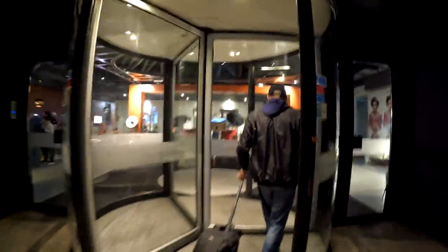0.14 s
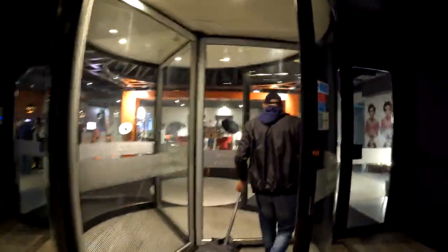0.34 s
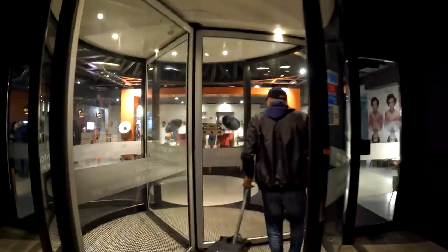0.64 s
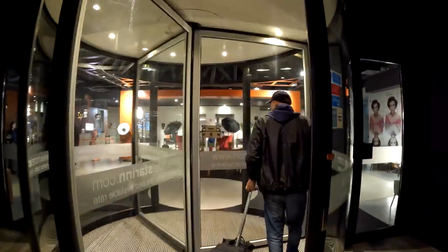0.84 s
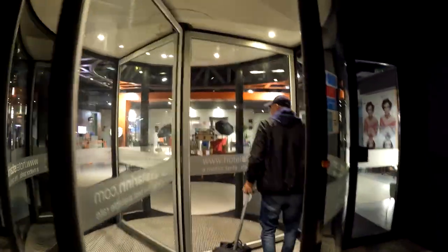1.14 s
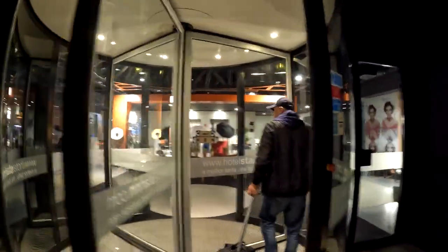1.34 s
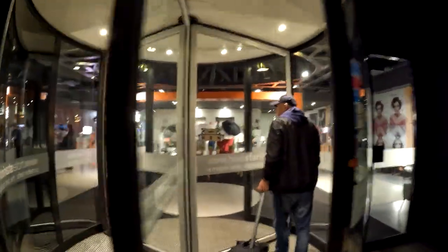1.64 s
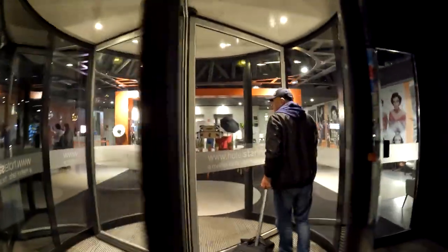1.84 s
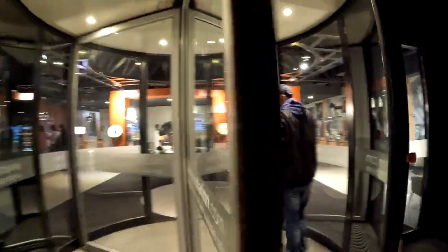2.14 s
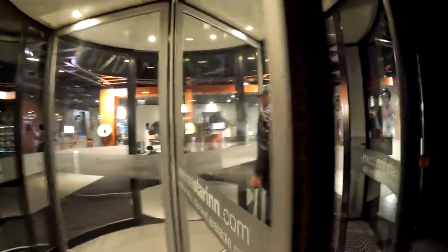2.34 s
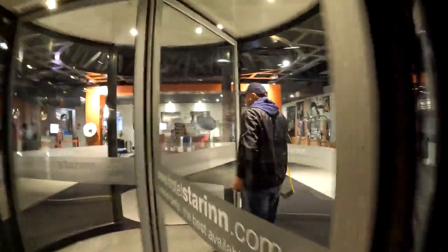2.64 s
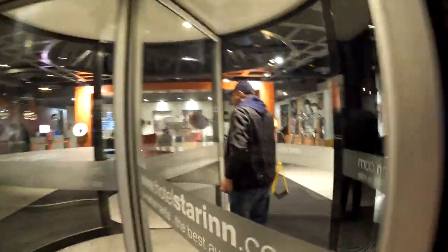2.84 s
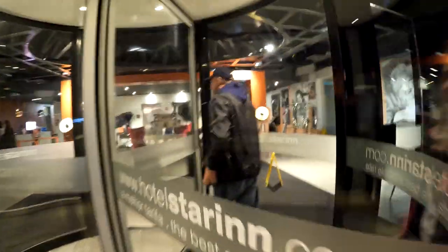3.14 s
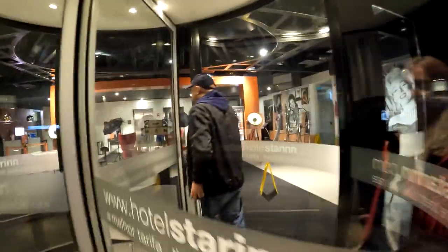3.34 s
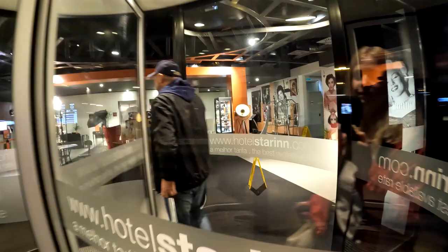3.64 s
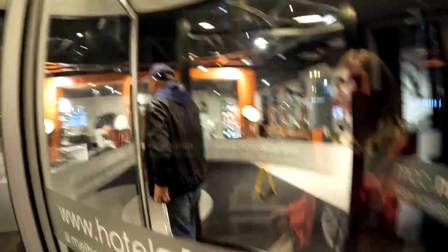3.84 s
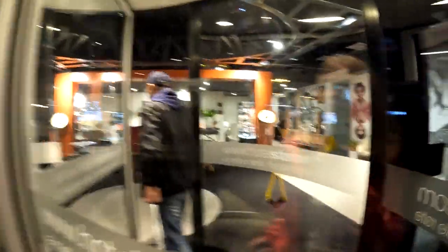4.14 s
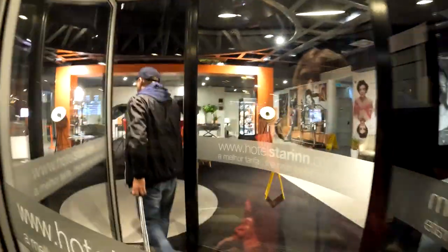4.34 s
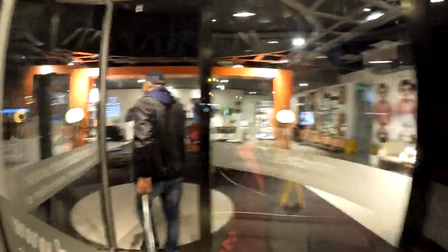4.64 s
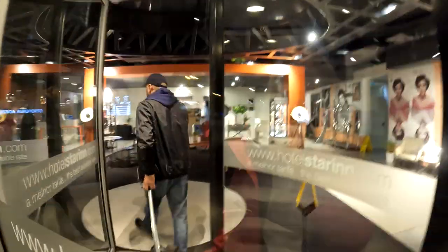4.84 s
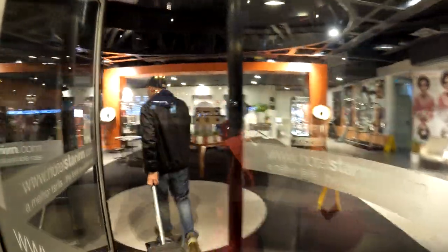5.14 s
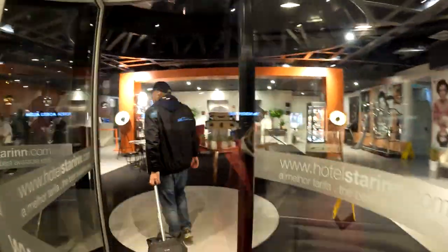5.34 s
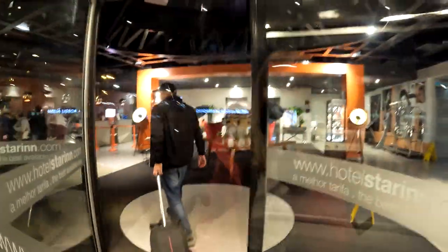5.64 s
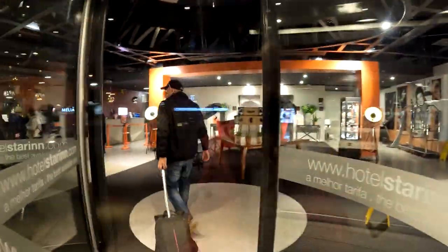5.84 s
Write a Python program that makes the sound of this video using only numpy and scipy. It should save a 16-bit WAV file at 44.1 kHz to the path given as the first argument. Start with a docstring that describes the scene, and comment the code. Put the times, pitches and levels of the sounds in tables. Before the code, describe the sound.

A wheeled suitcase rumbles through a revolving door over a deep droning boom, with cloth rustling and bursts of plastic clicks, knocks and thuds.

```python
"""The air in the drum of a glass revolving door booms at 52 to 62 Hz as a wheeled suitcase is pulled through.
Rough-floor noise drives the wheels' rumble and the hollow resonances of the case; smooth pulses make low thuds.
Cloth hisses by grainy friction; scuffs, scrapes and plastic snaps are brief noise bursts and short rings.
The handle rattles in its modes, zip pulls sing as thin tones, and the panes reverberate the contacts.
Banded noise makes the surrounding street and ventilation wash."""
import sys
import numpy as np
from scipy import signal
from scipy.io import wavfile

SR = 44100
rng = np.random.default_rng(int(sys.argv[2]) if len(sys.argv) > 2 else 0)


def nominal_scale(level):
    """Amplitude ratio for a level in decibels (scalar or array-like)."""
    x = np.asarray(level, float) / 20
    return 10 ** x


def generate_wav(signal):
    """Clip the signal to [-1, 1] and save it as 16-bit WAV at the path in sys.argv[1]."""
    frames = np.transpose(np.atleast_2d(signal))
    scaled = np.clip(frames, -1, 1) * 32767
    pcm = np.round(scaled).astype(np.int16)
    wavfile.write(sys.argv[1], SR, pcm)


N = 264159

# drum boom and rolling: time_s, boom_hz, boom_db, deep_rumble_db, wheel_rumble_db
ROLLING_COURSE = [(0.0, 58.4, -19, -43, -26), (0.23, 60.4, -26, -21, -29), (0.8, 61.7, -25, -29, -31.5),
                  (.96, 60.74, -32, -32, -29.5), (1.25, 60.65, -21.5, -38, -28),
                  (1.85, 59.6, -29, -30, -29), (2.15, 58.37, -32, -31, -30.5), (2.32, 61.66, -28, -25, -29),
                  (2.64, 53.45, -30.5, -26, -31.5), (2.95, 52.85, -27, -24.5, -31.5),
                  (3.08, 52.5, -23, -14.5, -27.5), (3.2, 52.4, -25, -25.5, -29),
                  (3.37, 52.13, -26, -19.5, -29.5), (3.49, 61, -24.5, -40, -29),
                  (3.57, 59.95, -19.5, -36, -31.5), (3.85, 61.47, -19.5, -27, -27.5),
                  (4.74, 61.44, -19.5, -27, -30.5), (5.12, 51.8, -20.5, -20.5, -28),
                  (5.36, 60.6, -17.5, -26, -27), (5.64, 61.75, -16.5, -23, -27),
                  (5.76, 55, -20, -15.5, -30), (5.91, 53.7, -24, -24, -23), (5.99, 57.6, -31, -17, -34)]
# hollow resonances of the case: centre_hz, width_hz, usual_level_db
CASE_RESONANCES = [(103.2, 18.3, -43), (141.9, 10.2, -41), (186.5, 19.6, -42), (239, 21, -42),
                   (279, 21, -43), (331, 59, -47.5)]
# for each case resonance in turn, its passing swells: middle_s, rise_db, length_s
CASE_SWELLS = [
    [(.15, 13.5, 0.31), (3.1, 13.5, 0.96), (4.05, 17, 0.91), (4.8, 13, 0.52)],
    [(.3, 7.5, 0.21), (3.45, 1, .4), (4.2, 7.5, 1), (5.2, 14, 0.63)],
    [(.6, 9.5, 0.97), (1.8, 7.5, 0.66), (4.8, 6, 0.32)],
    [(.3, 4, 0.54), (5.7, 2.5, 0.76)],
    [(1.8, 9, 0.54), (2.95, 6.5, 0.55), (5.6, 6.5, 0.93)],
    [(1.8, 1, 0.53), (4.1, 10, .4), (5.7, 5.5, 0.33)],
]
# relative spectrum of the street and ventilation wash: frequency_hz, density_db (per Hz)
WASH_SPECTRUM = [(190, 8), (330, -2), (436, -4), (614, -3.5), (780, -7), (980, -3), (1300, -8.5),
                 (1730, -11.5), (2400, -20), (3270, -25.5), (7110, -37.5), (8300, -54), (12000, -40),
                 (13400, -68.5), (15500, -73)]
# overall course of the wash: time_s, level_db
WASH_COURSE = [(0.0, -34.5), (1.2, -34.5), (2.9, -35), (3.75, -35.5), (4.05, -33.5), (4.35, -37),
               (5.0, -34), (5.99, -35)]
# left-right correlation of the wash: frequency_hz, likeness (0 to 1)
WASH_LIKENESS = [(60, 0.99), (150, 0.83), (360, 0.95), (880, 0.82), (2160, 0.5), (5290, 0.72),
                 (13000, 0.93)]
# left-right balance of the wash: frequency_hz, left_minus_right_db
WASH_LEAN = [(60, 0.0), (110, 0.0), (200, 12), (360, 0), (650, 1.5), (1190, 2), (2160, 1.5), (3930, 0),
             (7140, 1.5), (13000, 5)]
# steady rubbing of cloth and straps, before band weighting: time_s, relative_level_db
RUBBING_COURSE = [(0.0, -59.5), (.7, -61.5), (1.05, -61.5), (1.35, -69), (2.3, -59.5), (3.2, -65),
                  (3.82, -62), (3.85, -48), (3.9, -49), (3.95, -45.5), (4.05, -49), (4.2, -46.5),
                  (4.27, -57.5), (4.6, -61), (5.2, -64.5), (5.99, -59)]
# single swishes of cloth, before band weighting: peak_s, relative_level_db, brightness_db, t60_s
CLOTH_SWISHES = [(0.461, -49.5, -22, 0.19), (.56, -53.5, -22, 0.35), (1.68, -52, -19, 0.043),
                 (2.31, -54, -22, 0.41), (3.312, -47.5, -8, 0.17), (3.61, -54, -16, .5),
                 (3.975, -46, -8, 0.21), (4.1, -41, -12, 0.28), (4.36, -51, -18, 0.35),
                 (4.65, -58, -4, 0.38), (4.83, -52.5, -23, 0.14), (4.93, -56, -5, 0.34),
                 (5.07, -46.5, -13, 0.18), (5.2, -65.5, 3, 0.35), (5.4, -54, -22, 0.21),
                 (5.5, -53, -26, 0.29), (5.58, -53, -24, 0.22), (5.689, -66, -15, 0.24),
                 (5.76, -53, -22, 0.31), (5.889, -54, -11, 0.13)]
# damped rings of hard plastic; those starting together make one snap: start_s, level_db, pitch_hz, t60_s
PLASTIC_SNAPS = [(.0508, -37, 1500, 0.01), (.896, -38, 3660, .02), (3.2772, -37, 7400, .007),
                 (3.2775, -40, 11500, .008), (3.282, -36, 3000, .008), (3.3013, -20.5, 2820, 0.0075),
                 (3.301, -27, 1350, 0.011), (3.3018, -33, 10300, .004), (3.3012, -31, 5700, .004),
                 (3.3018, -29, 11800, .003), (3.314, -42, 7600, .008), (4.1115, -21, 10000, 0.0033),
                 (4.1115, -24, 12300, .003), (4.1106, -26, 7000, .006), (4.1245, -38, 8500, .008),
                 (4.126, -32, 11000, .003), (4.1686, -20, 1030, 0.0097), (4.171, -18, 2327, 0.0033),
                 (4.2035, -27.5, 3020, 0.009), (4.2093, -29, 2620, .01), (5.6928, -35, 3400, 0.007),
                 (5.694, -28, 1500, .01), (5.699, -24, 1920, .008), (5.7508, -35, 7500, .006),
                 (5.7508, -38, 11530, .004), (5.7605, -18, 1570, 0.006), (5.7613, -30, 3280, 0.0068),
                 (5.765, -21.5, 2030, 0.0094), (5.764, -33, 4700, .006), (5.7715, -33, 3200, .008),
                 (5.829, -18, 1510, 0.013), (5.832, -21, 2250, 0.0065), (5.8352, -19.5, 1970, 0.0064),
                 (5.8344, -19.5, 2800, .005), (5.836, -27, 3700, .005), (5.977, -28, 1810, .012)]
# scuffs and clicks of the case: start_s, knock_db, middle_db, sparkle_db
CASE_SCUFFS = [(0.453, -49, -55, -62), (0.533, -49, -50, -55), (.7244, -52, -53, -68),
               (0.868, -52, -60, -69), (0.896, -59, -50, -67), (0.9575, -51, -59, -62),
               (0.9696, -48, -50, -65), (0.995, -49, -48, -63), (1.0644, -55, -56, -56),
               (1.11, -43, -66, -70), (1.177, -51, -52, -66), (1.669, -55, -58, -50.5),
               (2.3007, -49, -52, -64), (2.479, -52, -46, -66), (2.7491, -55, -49, -60),
               (3.2773, -50, -46, -49), (3.297, -52, -52, -55), (3.3126, -47, -53, -56),
               (3.405, -54, -50, -64), (3.6075, -47, -47, -64), (3.8427, -53, -44, -58),
               (3.854, -51, -46, -64), (3.8707, -47, -39, -57), (3.9254, -42, -54, -60),
               (3.9423, -37.5, -50, -53), (3.973, -44, -38, -51), (4.006, -52, -39.5, -58),
               (4.041, -39, -46, -55), (4.091, -54, -40, -52), (4.109, -53, -50, -43),
               (4.124, -48, -44, -44), (4.172, -42.5, -50, -59), (4.1999, -42, -45, -56),
               (4.345, -46, -50, -60), (4.362, -48, -44, -56), (4.642, -51, -43, -50),
               (4.8921, -59, -51, -70), (4.915, -45.5, -53, -69), (5.0546, -47, -52, -60),
               (5.192, -54, -44, -66), (5.3082, -60, -50, -55), (5.3903, -45, -46.5, -63),
               (5.5038, -58, -51, -63), (5.565, -41.5, -58, -62), (5.692, -39, -52, -63),
               (5.758, -39, -44, -60), (5.8286, -52, -44, -62), (5.861, -52, -44, -63),
               (5.9146, -46, -47, -74), (5.971, -41, -46, -64)]
# scrapes of the shell against the door: start_s, length_s, level_db, centre_hz
SHELL_SCRAPES = [(0.457, 0.031, -53, 4400), (3.84, 0.016, -38, 2000), (3.842, 0.015, -39, 880),
                 (3.84, 0.011, -40, 3000), (3.986, 0.012, -36, 630), (3.915, 0.023, -43, 2500),
                 (3.917, 0.037, -44, 1300), (3.959, 0.0094, -39, 3700), (3.968, .012, -51, 6500),
                 (4.077, 0.012, -45, 4800), (4.093, 0.0075, -41, 4480), (4.103, .008, -45, 5500),
                 (4.119, 0.023, -37.5, 1130), (4.192, 0.026, -50, 1090)]
# zip pulls touching: start_s, level_db, pitch_hz, length_s
ZIP_TOUCHES = [(0.478, -51, 4000, 0.027), (0.495, -61, 6900, 0.026), (0.5, -66, 12300, 0.03),
               (0.724, -53, 4060, 0.057), (0.998, -47, 4060, 0.045), (3.898, -48, 6880, 0.014),
               (3.985, -50, 11200, .015), (4.017, -49, 11250, .011), (4.03, -52, 11250, .009),
               (4.039, -48, 11250, 0.011), (4.014, -41, 6800, 0.013), (5.214, -48.5, 7026, 0.023),
               (5.305, -61, 12000, 0.04), (5.863, -50, 9500, 0.01), (5.871, -46, 6840, 0.043)]
# low thuds of the case and wheels, with their rebounds and dying tails, before the shell's ring:
# centre_s, level_db, width_s
THUDS = [(3.108, -16.5, 0.00093), (3.128, -15.5, 0.0011), (3.5976, -4, 0.0017), (3.6124, -8, 0.0019),
         (4.0375, -10, 0.0011), (4.046, -16.5, 0.00084), (4.088, -15, 0.0015), (4.096, -22, 0.0018),
         (4.123, -26, 0.00051), (4.127, -19, 0.00069), (4.131, -30, 0.0004), (4.1382, -16, 0.0008),
         (4.1433, -23, 0.0007), (4.147, -13, 0.0033), (4.155, -19, 0.00084), (4.2, -26, 0.00067),
         (4.775, -19, 0.00091), (5.701, -9, 0.0028)]
# ring of the shell after a thud: centre_hz, width_hz, gain_db
SHELL_RING = [(137, 13, -6), (355, 48, 5.5), (446.9, 62, 7), (600, 57, 18.5)]
# shakes of the telescopic handle in its tube, as drive to its modes: start_s, drive_db
HANDLE_SHAKES = [(3.8579, -25.5), (3.861, -33), (3.868, -37), (3.8705, -34), (3.9101, -43), (3.948, -41),
                 (3.88, -40), (3.888, -42), (3.9, -49), (3.9534, -34), (3.967, -30.5), (3.978, -42),
                 (3.986, -44), (4.0081, -36)]
# modes of the handle: pitch_hz, gain_db, t60_s
HANDLE_MODES = [(2030, -6, 0.018), (2950, -1, 0.027), (3020, 3, 0.024), (3120, -4.5, 0.035),
                (3260, -9, 0.012), (3660, -10, 0.014), (3860, -24, 0.021), (5700, -8, 0.021)]


def rms_one(x):
    """Normalization of a signal to unit root-mean-square value."""
    return x / np.sqrt(np.mean(x ** 2) + 1e-20)


def in_time(rows):
    """Linear interpolation of a table's columns over all samples."""
    time_s, *columns = np.transpose(rows)
    return [np.interp(np.arange(N) / SR, time_s, column) for column in columns]


def at_hz(points, hz):
    """Interpolation of a spectrum on a logarithmic frequency axis."""
    table_hz, values = np.transpose(points)
    return np.interp(np.log(hz), np.log(table_hz + 1), values)


def drift(rate_hz):
    """Slow random fluctuation of unit rms: white noise through two equal low-pass poles at rate_hz."""
    step = 40     # samples between computed points
    r = np.exp(-2 * np.pi * rate_hz * step / SR)
    white = rng.standard_normal(N // step + 2002)
    slow = signal.lfilter([1], [1, -2 * r, r * r], white)[2000:]     # the filter has settled
    return np.interp(np.arange(N) / step, np.arange(len(slow)), rms_one(slow))


def band(x, low_hz, high_hz):
    """Band-pass filtering between two corner frequencies."""
    return signal.sosfilt(signal.butter(2, [low_hz, high_hz], "band", fs=SR, output="sos"), x)


def resonate(x, hz, width_hz):
    """Single damped resonance: a pole pair whose radius sets the bandwidth, with unit gain at the peak."""
    r = np.exp(-np.pi * width_hz / SR)
    zeros = np.array([1, 0, -1]) * (1 - r * r) / 2
    return signal.lfilter(zeros, [1, -2 * r * np.cos(2 * np.pi * hz / SR), r * r], x)


def resonate_twice(x, hz, width_hz):
    """Two equal resonances in cascade, which steepen the skirts."""
    return resonate(resonate(x, hz, width_hz), hz, width_hz)


def ring(clicks, hz, t60_s):
    """Impulse response of a damped mode: a unit click starts a sine of unit initial height."""
    r, w = nominal_scale(-60 / (t60_s * SR)), 2 * np.pi * hz / SR
    return signal.lfilter([0, np.sin(w)], [1, -2 * r * np.cos(w), r * r], clicks + 1e-18)


def boom(hz, level_db, steady, waver_hz, second_hz, second_db):
    """Air mode of the drum, driven steadily and waveringly, mixed with a weaker second mode of fixed pitch."""
    turn = np.exp(2j * np.pi * np.cumsum(hz) / SR)
    drive = steady + drift(waver_hz) + 1j * drift(waver_hz)
    main = rms_one((drive * turn).real)
    second = rms_one(resonate_twice(rng.standard_normal(N), second_hz, 20.0))
    return nominal_scale(level_db) * rms_one(main + nominal_scale(second_db) * second)


def rolling():
    """Roughness excitation: the floor drives wheels and hollow case, nearly alike in both ears."""
    boom_hz, boom_db, deep_db, rumble_db = in_time(ROLLING_COURSE)
    t = np.arange(N) / SR
    # the second mode near 53 Hz beats with the boom while that is near 61 Hz
    out = boom(boom_hz, boom_db, steady=1.31, waver_hz=15.4, second_hz=53.1, second_db=-14.0)

    deep = band(band(rng.standard_normal(N), 10.4, 43.6), 24.6, 53.7)
    out += nominal_scale(deep_db) * rms_one(deep * nominal_scale(1.3 * drift(6.8)))

    rough = rng.standard_normal(N) * nominal_scale(1.0 * drift(17.6))
    rumble = band(band(rough, 54.0, 300), 60.0, 300) + 2.92 * band(rough, 44.3, 141.0)
    out += nominal_scale(rumble_db) * rms_one(rumble)

    for (hz, width_hz, usual_db), swells in zip(CASE_RESONANCES, CASE_SWELLS):
        level_db = usual_db + 2.0 * drift(1.95)
        for middle_s, rise_db, length_s in swells:
            level_db += rise_db * np.exp(-(2 * (t - middle_s) / length_s) ** 2)
        out += nominal_scale(level_db) * rms_one(resonate_twice(rng.standard_normal(N), hz, width_hz))

    # the two ports differ slightly
    unlike = nominal_scale(-45) * rms_one(band(rng.standard_normal(N), 15, 50))
    unlike += nominal_scale(-61) * rms_one(band(rng.standard_normal(N), 60, 180))
    return out + unlike * [[1], [-1]]


def wash(patchy_db):
    """Diffuse noise field: third-octave bands, each with its own level, flicker, correlation and balance."""
    out = 0
    edges_hz = 280 * 2 ** np.arange(0, 6.1, 1 / 3)
    white = rng.standard_normal((2, 2, N))     # neighbouring bands take different noise
    gusts = 0.25 * drift(2.3) + 0.51 * drift(40)     # shared by all bands
    for k, (low_hz, high_hz) in enumerate(zip(edges_hz, edges_hz[1:])):
        mid, side = band(white[k % 2], low_hz, high_hz)
        hz = np.sqrt(low_hz * high_hz)
        alike = np.clip(at_hz(WASH_LIKENESS, hz), 0, 1)
        lean = nominal_scale(at_hz(WASH_LEAN, hz) / 2 * np.array([[1], [-1]]))
        gain = nominal_scale(at_hz(WASH_SPECTRUM, hz) + patchy_db * (gusts + drift(5.9)))
        stereo = np.sqrt(1 + alike) * mid + np.sqrt(1 - alike) * side * [[1], [-1]]
        out = out + gain * lean * stereo
    return nominal_scale(in_time(WASH_COURSE)[0]) * rms_one(out)


def grains(per_s, spread_db, share):
    """Stick-slip friction in stereo: smooth noise with random tiny snaps in it."""
    heights = nominal_scale(spread_db * np.minimum(rng.exponential(1, N), 4))
    tiny_snaps = (rng.random(N) < per_s / SR) * heights * rng.choice([-1, 1], N)
    unlike = 0.7 * rng.standard_normal((2, N))
    return rng.standard_normal(N) + share * rms_one(tiny_snaps) + unlike


def patchy(x, low_hz, high_hz, patchy_db, rate_hz):
    """Independent modulation of four strips, equally wide in logarithmic frequency."""
    edges_hz = np.geomspace(low_hz, high_hz, num=5)
    return sum(band(x, low, high) * nominal_scale(patchy_db * drift(rate_hz)) for low, high in zip(edges_hz, edges_hz[1:]))


def rustle():
    """Friction of cloth: grainy hiss falling towards the treble, with a fluttering top band of its own."""
    t = np.arange(N) / SR
    body_power = nominal_scale(2 * in_time(RUBBING_COURSE)[0])
    bright_power = body_power * nominal_scale(2 * -16)     # brightness of the steady rubbing, dB
    for peak_s, db, bright_db, t60_s in CLOTH_SWISHES:
        rise_db = 10 * (peak_s - t) / 0.022
        fall_db = 60 * (t - peak_s) / t60_s
        swish_power = nominal_scale(2 * (db - np.where(t < peak_s, rise_db, fall_db)))
        body_power = body_power + swish_power     # powers add
        bright_power = bright_power + swish_power * nominal_scale(2 * bright_db)

    rub = grains(650, spread_db=-0.5, share=0.71) * nominal_scale(1.3 * drift(30))
    airy = rub + 1.7 * rng.standard_normal((2, N))     # the top differs more between the ears
    top = patchy(airy * np.sqrt(bright_power), 4750, 13000, patchy_db=3.0, rate_hz=40)
    top = top * nominal_scale(np.array([[6.5], [0.5]]))
    rub = rub * np.sqrt(body_power)
    flickering = patchy(rub, 2100, 7080, patchy_db=5.5, rate_hz=33)
    return 0.56 * flickering + 2.81 * band(rub, 1420, 5180) + top


def snaps():
    """Impulse response of hard plastic: each row is one damped ring; rings starting together make one snap."""
    out = np.zeros(N)
    impulse = np.pad(np.array([.25, .5, .25]), (0, 1997))
    for start_s, db, hz, t60_s in PLASTIC_SNAPS:
        i = round(start_s * SR)
        out[i:i + 2000] += nominal_scale(db) * ring(impulse, hz, t60_s)[:N - i]
    return out


def drum_reverberation(x):
    """Reverberation between the glass panes: convolution with dying noise, another in each ear."""
    t = np.arange(int(.3 * SR)) / SR
    t60_s, delay_s = 0.11, .004
    tail = rng.standard_normal((2, len(t))) * nominal_scale(-60 * t / t60_s) * (t > delay_s)
    tail = signal.lfilter([.5], [1, -.5], tail)     # dulls the treble
    tail = tail / np.sqrt(np.sum(tail ** 2) / 2)
    return signal.fftconvolve(x[None], tail, axes=1)[:, :N]


def scuffs():
    """Contact transients: a sharp tick and a dying burst of grains in knock, middle and sparkle bands."""
    out, t = np.zeros((2, N)), np.arange(int(.15 * SR)) / SR
    edges_hz = ((1250, 4600), (2600, 7050), (7500, 13000))
    burst = grains(2000, spread_db=4.0, share=0.6)
    layers = [rms_one(band(burst, *pair)) for pair in edges_hz]
    layers[0] = rms_one(layers[0] + 0.38 * resonate(layers[0], 1700, 410))     # the shell knocks woodily

    click = signal.unit_impulse(len(t), idx=60)
    ticks = [band(click, *pair) for pair in edges_hz]
    rebound_s = 0.0056     # a knock touches twice
    touch = click + 0.61 * signal.unit_impulse(len(t), idx=60 + round(rebound_s * SR))
    ticks[0] = band(touch, 1600, 2760) + 3.1 * resonate_twice(touch, 1480, 560)

    # faint scuffs at random, 3 per second on average
    starts = np.flatnonzero(rng.random(N // 100) < 3 * 100 / SR) * 100 / SR
    faint = [(start_s, -48, -63, -70) for start_s in starts]

    dying = (1 - np.exp(-t / 0.00023)) * nominal_scale(-60 * t / 0.065)     # t60 is 0.065 s
    for start_s, *levels_db in CASE_SCUFFS + faint:
        i = round(start_s * SR)
        shape = dying[:N - i]
        span = slice(i, i + len(shape))
        for layer, tick, db in zip(layers, ticks, levels_db):
            crack = 3.8 * tick[:N - i] / tick.max()
            out[:, span] += nominal_scale(db) * (shape * layer[:, span] + crack)
    return out * nominal_scale(np.array([[.4], [-.4]]))


def scrapes():
    """Stick-slip of shell on door: uneven grains catch and let go, coloured by one broad resonance."""
    out = np.zeros((2, N))
    grit = grains(900, spread_db=7.0, share=1.3)
    for start_s, length_s, db, hz in SHELL_SCRAPES:
        i, count = round(start_s * SR), round(length_s * SR)
        shape = np.pad(np.sqrt(np.hanning(count)), (0, count))     # silence lets the resonance ring out
        stroke = grit[:, i:i + 2 * count] * shape
        out[:, i:i + 2 * count] += nominal_scale(db) * rms_one(resonate_twice(stroke, hz, hz / 2.5))
    return out


def zip_pulls():
    """Tonal radiation of small metal parts: thin tones, wavering in level and phase."""
    out, t = np.zeros(N), np.arange(int(.08 * SR)) / SR
    flutter, wobble = drift(90), drift(60)
    for start_s, db, hz, length_s in ZIP_TOUCHES:
        i = round(start_s * SR)
        span = slice(i, i + len(t))
        swell = np.minimum(t / 0.005, 1) * np.sqrt((1 - t / length_s).clip(0))
        tone = np.sin(2 * np.pi * hz * t + 0.83 * wobble[span])
        out[span] += nominal_scale(db + 2.3 * flutter[span]) * swell * tone
    return out


def thuds():
    """Pulse excitation: soft pushes with a swing back on either side, and the shell's short ring."""
    out, t = np.zeros(N), np.arange(-400, 400) / SR
    for centre_s, db, width_s in THUDS:
        i = round(centre_s * SR)
        square = (t / width_s) ** 2
        out[i - 400:i + 400] -= nominal_scale(db) * (1 - .5 * square) * np.exp(-.5 * square)
    return out + sum(nominal_scale(db) * resonate(out, hz, width_hz) for hz, width_hz, db in SHELL_RING)


def handle():
    """Modal response of the handle: each shake is a short chatter of rebounds that rings its modes."""
    t, out, chatter = np.arange(int(.08 * SR)) / SR, np.zeros(N), np.zeros(N)
    rebounds = (rng.random(N) < 900 / SR) * rng.uniform(-0.17, 0.18, N)
    for start_s, db in HANDLE_SHAKES:
        i = round(start_s * SR)
        chatter[i] += nominal_scale(db)
        chatter[i:i + len(t)] += nominal_scale(db - 60 * t / 0.058) * rebounds[i:i + len(t)]
    chatter = band(chatter, 1300, 4900)     # plastic stops soften each touch
    for hz, gain_db, t60_s in HANDLE_MODES:
        out += nominal_scale(gain_db) * ring(chatter * nominal_scale(2.9 * drift(150)), hz, t60_s)
    return out


def scene():
    """Superposition: rumble in the middle, small contacts a little to the left, wash all round."""
    contacts = snaps() + scuffs() + scrapes() + zip_pulls() + handle()
    near = (contacts + rustle()) * nominal_scale(np.array([[.7], [-.7]]))
    reverberation = nominal_scale(-8.5) * drum_reverberation(contacts.mean(axis=0))
    return rolling() + thuds() + near + reverberation + wash(patchy_db=1.06)


def band_limit(x):
    """A steep low-pass at the top of the band."""
    return signal.sosfilt(signal.butter(12, 15600, fs=SR, output="sos"), x)


def record(dry):
    """Transducer bandwidth: the microphone rolls off above 12.8 kHz."""
    soft = signal.sosfilt(signal.butter(6, 12800, fs=SR, output="sos"), dry)
    return band_limit(soft)


dry = scene()
out = record(dry)
generate_wav(out)
```